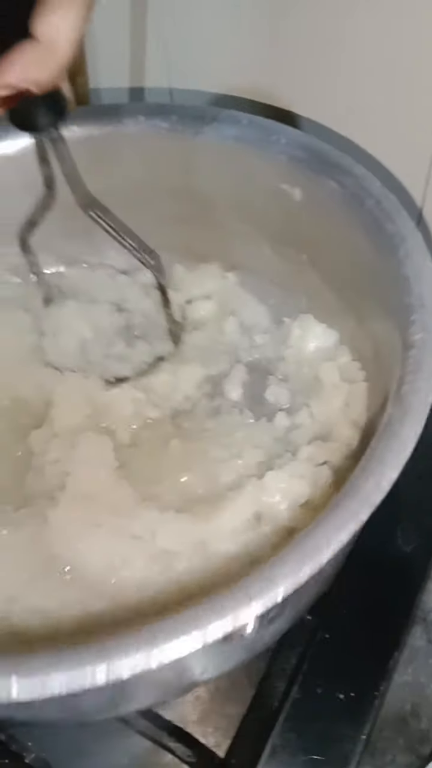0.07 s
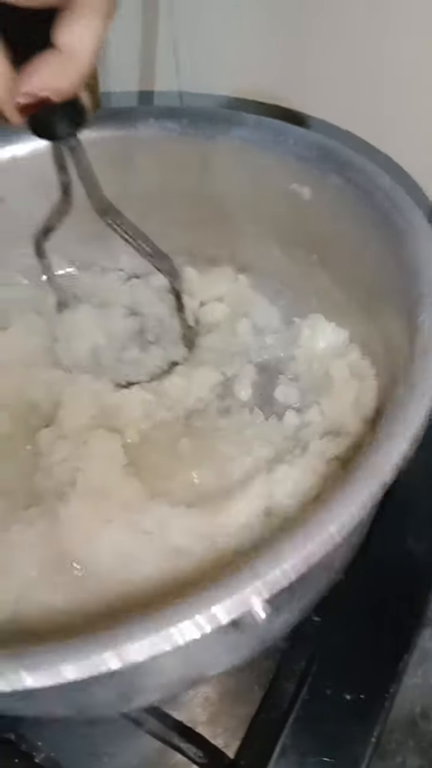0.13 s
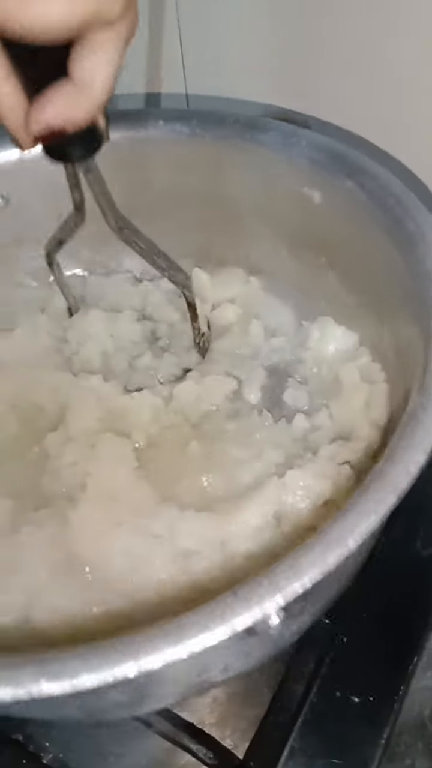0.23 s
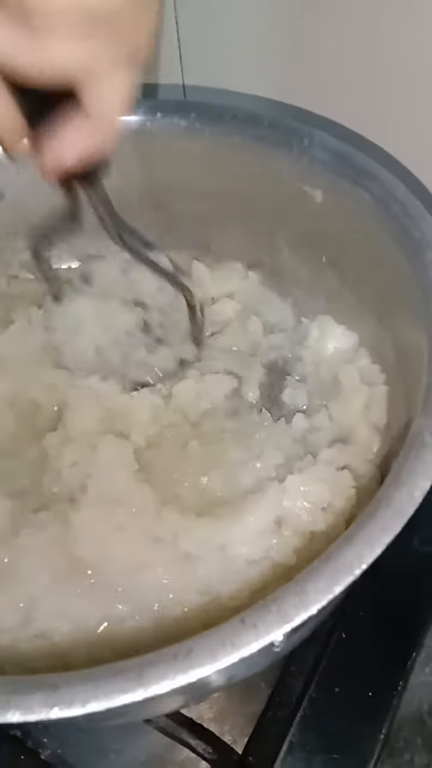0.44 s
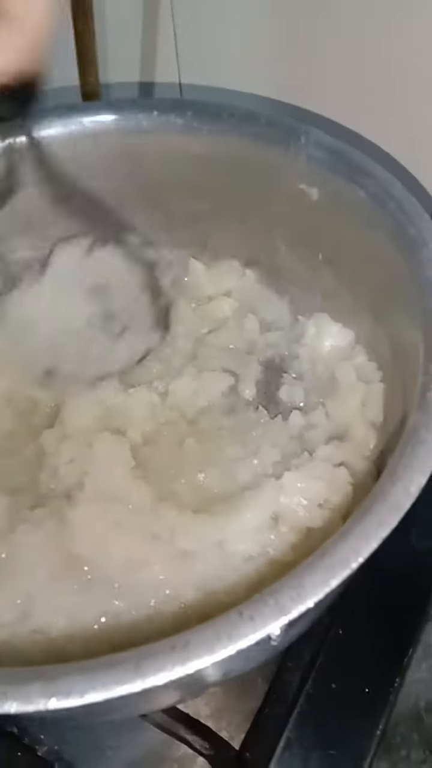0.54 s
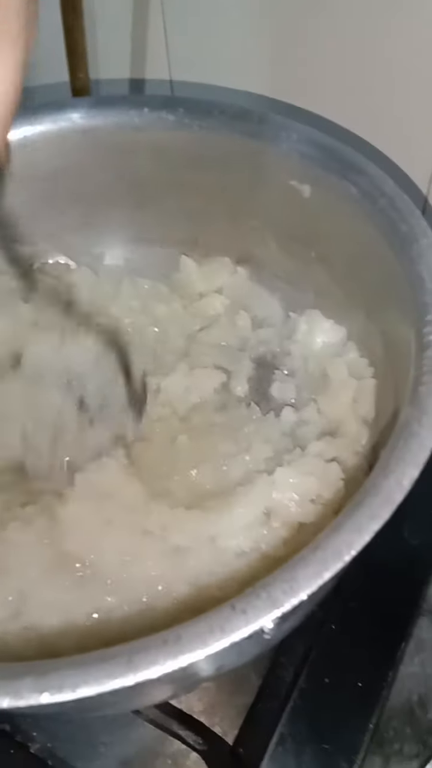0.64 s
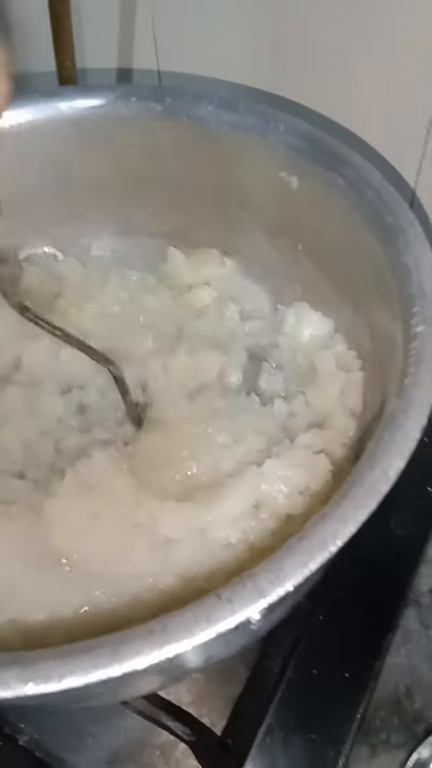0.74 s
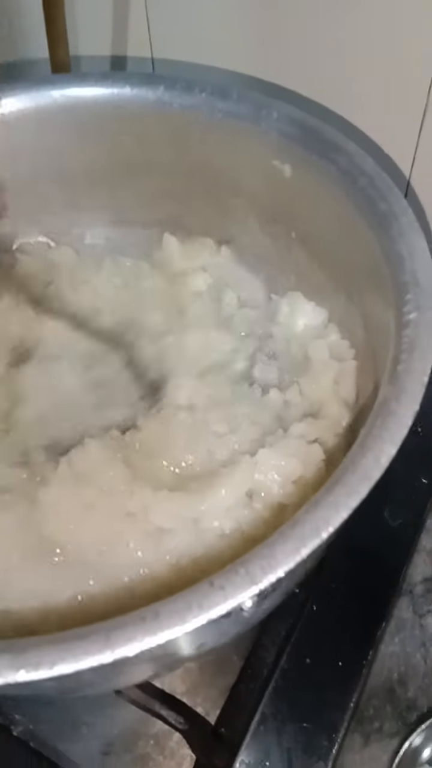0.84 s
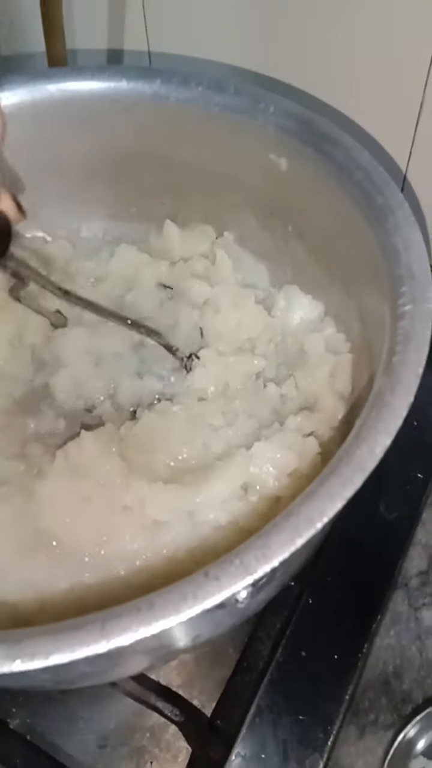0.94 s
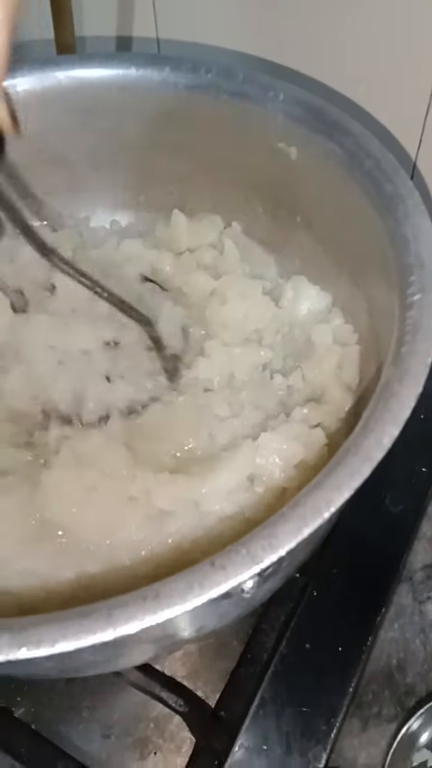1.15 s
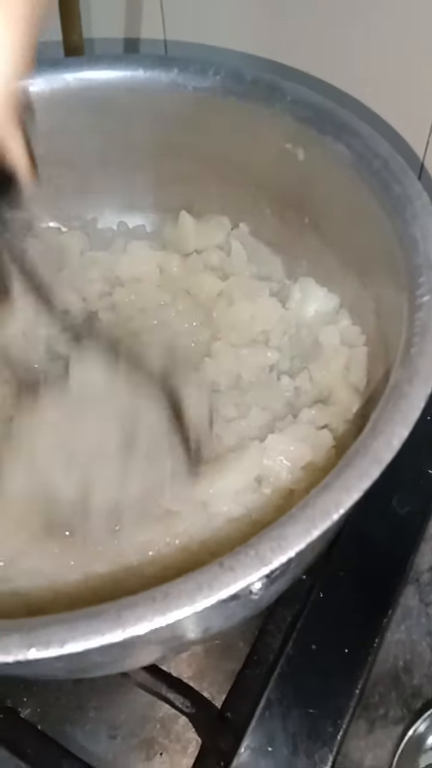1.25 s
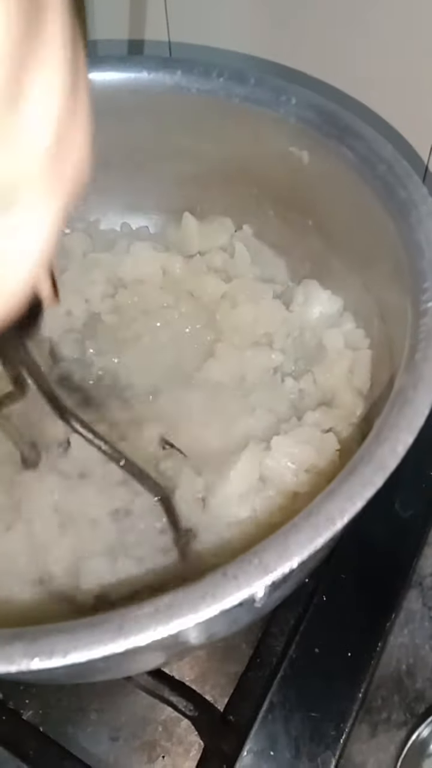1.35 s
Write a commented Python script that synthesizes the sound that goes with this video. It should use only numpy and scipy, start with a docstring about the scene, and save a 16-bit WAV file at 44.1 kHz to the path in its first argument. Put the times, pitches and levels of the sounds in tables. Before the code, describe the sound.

A wire masher in a metal pot of soft boiled vegetables, heard close in a kitchen over faint fading hiss. A wire ring dies away as wet mash fizzes. Thuds and clinks come at 0.2-0.3 s, then the loudest clanking blow at 0.4 s with a brief squeak, and duller knocks near 0.55 s. Soft presses follow from 0.76 s, a wet suck at 1.0 s, and a faint clink at 1.14 s.

```python
"""A wire masher works soft boiled vegetables in a wide metal pot on a kitchen stove, over a faint ebbing hiss.
At first the free wire still rings from a blow, as decaying sines, while a press fizzes as filtered wet grains.
Then the wire thuds through the mash onto the bottom and clinks on bare metal, both as struck modes with noise
tails, and squeaks as a wavering tone. Further presses fizz and rumble; near one second the masher pulls free
with a wet suck, a smooth swell of grains, and the last soft thuds and a faint clink follow."""
import sys
import numpy as np
from scipy import signal
from scipy.fft import rfft, irfft, next_fast_len
from scipy.io import wavfile
from scipy.ndimage import uniform_filter1d

SR = 44100
rng = np.random.default_rng(int(sys.argv[2]) if len(sys.argv) > 2 else 0)


def pcm_store(signal):
    """Save signal as 16-bit PCM."""
    levels = np.round(np.clip(np.atleast_2d(signal), -1, 1) * 32767)
    wavfile.write(sys.argv[1], SR, levels.astype(np.int16).T)


N = 61739
T = np.arange(N) / SR  # time [s]


def amp(db):
    """Level law: a level in decibels becomes an amplitude ratio."""
    return 10 ** (np.asarray(db) / 20)


def rms_one(x):
    """Normalisation: scale to unit root-mean-square amplitude."""
    return x / np.sqrt(np.mean(x ** 2) + 1e-20)


def colour(x, spectrum):
    """Spectral shaping: weight a steady signal by (frequency [Hz], level [dB]) points; rms 1."""
    hz, db = np.transpose(spectrum)
    size = next_fast_len(N)
    bins = np.maximum(np.arange(size // 2 + 1) * SR / size, 1)
    weight = amp(np.interp(np.log(bins), np.log(hz), db))
    return rms_one(irfft(rfft(x, size) * weight, size)[:N])


def noise(spectrum):
    """Coloured noise: white Gaussian noise with a shaped spectrum; rms 1."""
    return colour(rng.standard_normal(N), spectrum)


def narrow_noise(hz, width_hz):
    """Resonance: white noise passed through one narrow band; rms 1."""
    edges = [hz - width_hz / 2, hz + width_hz / 2]
    band = signal.butter(2, edges, "band", fs=SR, output="sos")
    return rms_one(signal.sosfilt(band, rng.standard_normal(N)))


def lowpass(x, hz):
    """Second-order low-pass: amplitude falls by 12 dB per octave well above the cut-off."""
    return signal.sosfilt(signal.butter(2, min(hz, SR / 3), fs=SR, output="sos"), x + 1e-18)


def highpass(x, hz):
    """Second-order high-pass: amplitude falls by 12 dB per octave well below the cut-off."""
    return signal.sosfilt(signal.butter(2, min(hz, SR / 3), "high", fs=SR, output="sos"), x)


def fade(t60):
    """Exponential decay: the level falls by 60 dB in t60 seconds."""
    return np.exp(-np.minimum(np.log(1000) * T / t60, 40))


def ring(modes):
    """Modal synthesis: a struck body is a sum of decaying sines (frequency [Hz], level [dB], t60 [s])."""
    return sum(amp(db) * fade(t60) * np.sin(2 * np.pi * hz * T) for hz, db, t60 in modes)


def add(out, s, x):
    """Superposition: mix a sound in from time s on."""
    start = max(int(s * SR), 0)
    out[start:] += x[:N - start]


def swell(s, length, attack, release):
    """Envelope: linear attack, hold until s + length, exponential release (all in seconds)."""
    return np.clip((T - s) / attack, 0, 1) * np.exp(-np.maximum(T - s - length, 0) / release)


def bump(centre, width):
    """Gaussian curve: one smooth peak, 1 at its centre."""
    return lambda x: np.exp(-.5 * ((x - centre) / width) ** 2)


def grains(spectrum):
    """Granular noise: sparse random impulses, tiny wet bursts of uneven size, coloured; rms 1."""
    grains_per_s, spread_db = 4400, 1.5
    sizes = amp(spread_db * np.minimum(rng.exponential(1, N), 4))
    signed = sizes * rng.choice([-1, 1], N)
    return colour(signed * (rng.random(N) < grains_per_s / SR), spectrum)


def hollow(x):
    """Cavity resonance: the hollow of the pot lifts a steady signal at its own frequencies; rms 1."""
    # resonances of the pot's hollow: (frequency [Hz], width [Hz], lift [dB])
    resonances = [(905, 100, 3.5), (2400, 135, 4.5), (2956, 60, 8), (3350, 34, 13), (3960, 190, 5.5),
                  (4386, 100, 2), (5420, 160, 8.5), (6150, 90, 6), (6650, 170, 11), (7730, 130, 14),
                  (8880, 141, 8.5), (10230, 270, 12.5), (11500, 140, 5), (13300, 450, 2)]
    size = next_fast_len(N)
    bins = np.arange(size // 2 + 1) * SR / size
    lift_db = sum(db * bump(hz, width)(bins) for hz, width, db in resonances)
    return rms_one(irfft(rfft(x, size) * amp(lift_db), size)[:N])


def hiss():
    """Stationary noise and resonance: a broad hiss with a few narrow bands, slowly ebbing."""
    # background spectrum: (frequency [Hz], relative density [dB per Hz])
    spectrum = [(40, -34.5), (105, -6.5), (150, -12.5), (500, -19), (1000, -16), (1800, -9), (2600, -6),
                (3650, -22.5), (4050, -4.5), (5000, -9.5), (6500, -9), (9300, -13), (12000, -17),
                (15500, -17.5)]
    # resonances in the hiss: (frequency [Hz], width [Hz], rms level at the start [dB])
    tones = [(104.6, 24.4, -82.5), (896, 110, -67), (7730, 140, -64.5)]
    start_db, ebb_db_per_s = -58, 4
    broad = amp(start_db) * hollow(noise(spectrum))
    narrow = sum(amp(db) * narrow_noise(hz, width) for hz, width, db in tones)
    return (broad + narrow) * amp(-ebb_db_per_s * T)


def free_wire():
    """Free vibration: the wire loop's modes hold briefly and ring out, with the kitchen's tail around them."""
    # modes of the free wire: (frequency [Hz], level [dB], rise [s], held until [s], t60 [s])
    wire_modes = [(254, -35, .004, .1, .45), (732, -29, .001, .008, .25), (1357, -35, .04, .065, .21),
                  (2062, -33, .03, .07, .3), (2765, -40, .01, .06, .26), (2977, -46, .001, .005, .25),
                  (5292, -45, .001, .02, .3), (6045, -51, .001, .005, .4), (8538, -50, .001, .005, .26)]
    # spectrum of the tail: (frequency [Hz], relative density [dB per Hz])
    room = [(50, -16.5), (90, -12), (300, 9.5), (500, 1), (750, 1.5), (2000, 2), (3000, -0.5), (3650, -6.5),
            (4100, -6), (8500, -13), (10000, -32.5), (15000, -29)]
    room_db, room_t60_s = -30.5, 0.36
    out = amp(room_db) * fade(room_t60_s) * noise(room)
    for hz, db, rise, hold, t60 in wire_modes:
        envelope = swell(0, hold, rise, t60 / np.log(1000))
        out += amp(db) * envelope * np.sin(2 * np.pi * hz * T)
    return out


def mash():
    """Granular flow and friction: pressed mash fizzes, the dragged wire rumbles on the bottom, the lift sucks."""
    # presses through the mash: (time [s], length [s], wet fizz level [dB], initial rumble level [dB])
    presses = [(0, 0.16, -53.5, -58), (0.187, 0.19, -51.5, -37.5), (0.391, .225, -53, -35),
               (0.764, 0.056, -53, -65.5), (0.828, 0.11, -56, -50), (0.967, 0.099, -59.5, -54.5)]
    # spectra of the three sounds: (frequency [Hz], relative density [dB per Hz])
    fizz_spectrum = [(600, -24), (1400, 0.5), (1750, -4.5), (2800, -5.5), (3600, -10.5), (4150, 3),
                     (5100, -4), (6600, -8), (8200, -4), (9300, -10), (12000, -15.5), (15500, -25.5)]
    rumble_spectrum = [(40, -28), (68, 1.5), (110, 9), (170, -11), (340, -4), (580, -11.5), (900, -7),
                       (1500, -26), (2200, -49.5), (5000, -45.5)]
    suck_spectrum = [(60, -49), (130, -52), (205, 13), (300, -17), (400, -2), (580, -21), (1050, -8),
                     (1650, -14.5), (1950, -12.5), (3000, -17.5), (8000, -17), (14000, -39)]
    attack_s, release_s = .012, 0.023
    linger_db, linger_s = -24, 0.2735  # the mash fizzes on faintly after each press
    sag_db_per_s = 15.5  # the drag slows as the press goes on
    fizz, rumble = 0, 0
    for s, length, fizz_db, rumble_db in presses:
        press = swell(s, length, attack_s, release_s)
        linger = amp(linger_db) * swell(s, length, attack_s, linger_s)
        fizz += amp(fizz_db) * (press + linger)
        drag = swell(s, length, attack_s, release=0.0017)
        rumble += amp(rumble_db - sag_db_per_s * (T - s)) * drag
    # the masher pulls free and air rushes into the hole
    suck_s, suck_width_s, suck_db = 1.002, 0.023, -43
    suck = amp(suck_db) * bump(suck_s, suck_width_s)(T)
    out = fizz * hollow(grains(fizz_spectrum))
    return out + rumble * grains(rumble_spectrum) + suck * grains(suck_spectrum)


def squeaks():
    """Frictional oscillation: the sliding wire sings one tone, randomly modulated in pitch and amplitude."""
    # wire sliding on the metal: (time [s], length [s], mean pitch [Hz], level [dB])
    slides = [(0.4288, 0.0032, 3250, -20.5), (0.433, 0.024, 3407, -26), (0.913, 0.015, 3310, -50.5)]
    waver_rms_hz, modulation_cutoff_hz, roughness_rms = 70, 210, 0.338
    waver = rms_one(lowpass(rng.standard_normal(N), modulation_cutoff_hz))
    flutter = rms_one(lowpass(rng.standard_normal(N), modulation_cutoff_hz))
    out = np.zeros(N)
    for s, length, hz, db in slides:
        phase = 2 * np.pi * np.cumsum(hz + waver_rms_hz * waver) / SR
        out += amp(db) * swell(s, length, attack=0.0022, release=0.0033) * np.sin(phase)
    return (1 + roughness_rms * flutter) * out


def clinks():
    """Hard impact: bare contact excites a bright crack, short metal modes and the kitchen's tail in one band."""
    # bare wire on metal: (time [s], level [dB], low edge [Hz], high edge [Hz])
    contacts = [(.198, -29, 920, 3500), (0.2345, -18.5, 2760, 9000), (0.293, -31, 2800, 5000),
                (.311, -30, 1500, 6080), (.3688, -39, 6000, 12200), (0.3981, -4.5, 500, 14000),
                (0.4023, -16.5, 497.4, 13940), (.4252, -14, 1480, 10950), (0.7769, -34, 7850, 14000),
                (.862, -35.5, 6080, 11030), (1.137, -51.5, 2200, 3488)]
    # modes of wire and wall in contact: (frequency [Hz], level [dB], t60 [s])
    contact_modes = [(2318, -20, 0.13), (2925, -16.5, 0.1), (3305, -29.5, .6), (5600, -12, 0.043),
                     (6470, -19.5, .1), (6900, -14, 0.044), (7240, -32.5, 0.088), (7980, -25.5, .12),
                     (8330, -24.5, .1), (10160, -35, .12), (10550, -35, 0.065), (12720, -36.5, .12)]
    # spectrum of crack and tail: (frequency [Hz], relative density [dB per Hz])
    crack = [(900, -14.5), (2000, -4), (3000, -1.5), (4400, -10.5), (5700, -6.5), (6800, -1), (7700, -7),
             (8700, -7.5), (9600, -17.5), (12700, -25), (15500, -36)]
    crack_db, crack_t60_s = -4.5, 0.032
    room_db, room_t60_s = -25, .4
    build_s = 0.00096  # time constant of the onset
    out, metal = np.zeros(N), ring(contact_modes)
    decay = amp(crack_db) * fade(crack_t60_s) + amp(room_db) * fade(room_t60_s)
    onset = 1 - np.exp(-T / build_s)
    for s, db, low_hz, high_hz in contacts:
        hit = (metal + decay * noise(crack)) * onset
        add(out, s, amp(db) * lowpass(highpass(hit, low_hz), high_hz))
    return out


def thuds():
    """Cushioned impact: a thump, the pot's modes and a diffuse boom, steeply dulled by the mash under the wire."""
    # thuds on the pot bottom: (time [s], level [dB], contact cut-off [Hz], level of the pot's ring [dB])
    blows = [(.198, -15.5, 2130, 1.5), (0.2243, -18.5, 1200, 2.5), (0.2364, -21, 2250, 1),
             (0.257, -48, 1210, 5), (0.295, -14.5, 1600, -2.5), (.323, -32.5, 2950, 1.5),
             (0.3993, -10, 6900, 6.5), (0.4071, -6, 2960, -6), (.4262, -23.5, 3500, 7),
             (.445, -7, 2200, -4.5), (0.552, -18, 2830, -5), (0.5563, -19, 1490, -16),
             (0.6011, -35.5, 1283, 0), (.8145, -28.5, 455, 2.5), (0.847, -24.5, 480, -3),
             (.871, -43, 660, 13.5), (.996, -36, 1510, -0.5), (1.019, -34.5, 640, -5.5)]
    # modes of the loaded pot: (frequency [Hz], level [dB], t60 before the mash damping [s])
    pot_modes = [(71, -17, .4), (110, -39, .35), (152, -42, .2), (206, -18.5, .3), (264.4, -25, .18),
                 (303, -12, .16), (371, -18.5, 0.16), (447, -36, .33), (703.3, -22.5, 0.36),
                 (781.6, -29, .32), (957, -32, .4), (1068, -30, .35), (1322, -39, .35), (1730, -23.5, 0.22)]
    # pot and kitchen answering a thud: (frequency [Hz], relative density [dB per Hz])
    boom = [(40, -33.5), (65, -5), (150, -4), (300, 8.5), (450, 2), (590, -7), (950, -5.5), (1600, -9),
            (2200, -26), (4000, -18.5), (12000, -44.5)]
    thump_hz, thump_t60_s = 269, 0.01
    boom_db, boom_t60_s, boom_build_s = -11, 0.32, .004  # t60 before the mash damping
    damping_s_per_hz = .0009  # t60 of the extra damping per Hz of cut-off: soft thuds die sooner
    out, thump, pot = np.zeros(N), ring([(thump_hz, 0, thump_t60_s)]), ring(pot_modes)
    tail = amp(boom_db) * fade(boom_t60_s) * (1 - np.exp(-T / boom_build_s))
    for s, db, contact_hz, ring_db in blows:
        damping = fade(damping_s_per_hz * contact_hz)
        hit = thump + amp(ring_db) * (pot + tail * noise(boom)) * damping
        add(out, s, amp(db) * lowpass(lowpass(hit, contact_hz), contact_hz))
    return out


def scene():
    """Superposition: all sources sum at one close microphone."""
    return (hiss() + free_wire() + mash() + squeaks() + clinks() + thuds())[None]


def suppress(x):
    """Spectral gating: each frequency is turned down, to a limit, as its power sinks below a threshold."""
    # noise suppressor threshold in a 23 ms frame: (frequency [Hz], level [dB])
    threshold_points = [(60, -76.5), (110, -88.5), (200, -88), (400, -61), (570, -61.5), (720, -83.5),
                        (900, -100), (1300, -76), (1850, -79), (2500, -81.5), (3300, -90), (3620, -82.5),
                        (4000, -110), (15000, -120)]
    least_gain_db = -13.5
    bins, _, frames = signal.stft(x, SR, nperseg=1024, noverlap=768)
    hz, db = np.transpose(threshold_points)
    threshold = amp(np.interp(np.log(bins + 1), np.log(hz), db))[:, None] ** 2
    # power averaged over three neighbouring frames
    power = uniform_filter1d(np.abs(frames) ** 2, size=3, axis=-1).clip(1e-20)
    gain = np.maximum(power / (power + threshold), amp(least_gain_db))
    return signal.istft(frames * gain, SR, nperseg=1024, noverlap=768)[1][..., :N]


def record(dry):
    """Band limiting and saturation: low cut, noise suppressor, rounded peaks and a cut top."""
    low_cut_hz, top_cut_hz = 74.4, 15600
    low_cut = signal.butter(6, low_cut_hz, "high", fs=SR, output="sos")
    top_cut = signal.ellip(12, .1, 70, top_cut_hz, fs=SR, output="sos")
    x = suppress(signal.sosfilt(low_cut, dry))
    rounded = 2 * np.tanh(x / 2)
    return signal.sosfilt(top_cut, rounded)


dry = scene()
out = record(dry)
pcm_store(out)
```